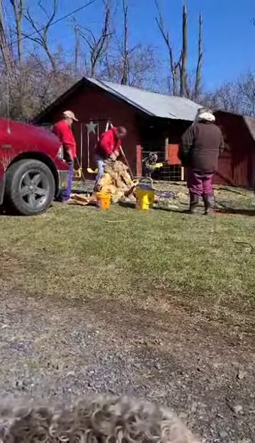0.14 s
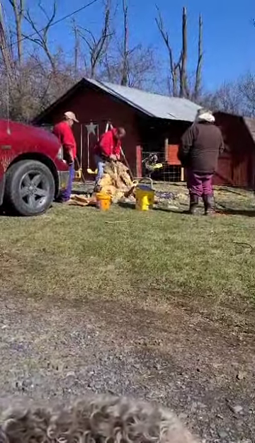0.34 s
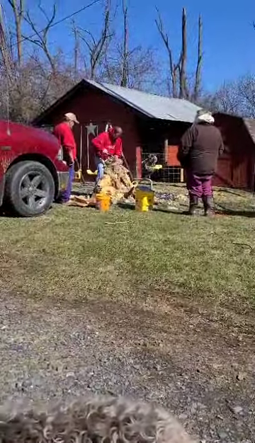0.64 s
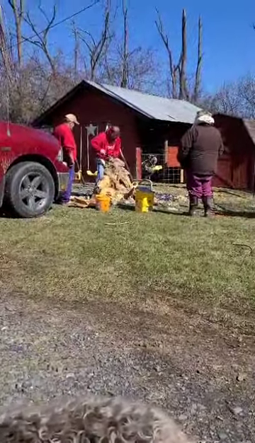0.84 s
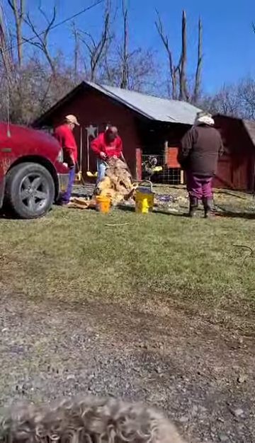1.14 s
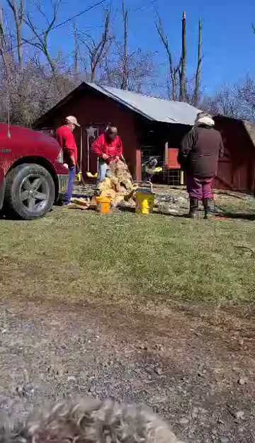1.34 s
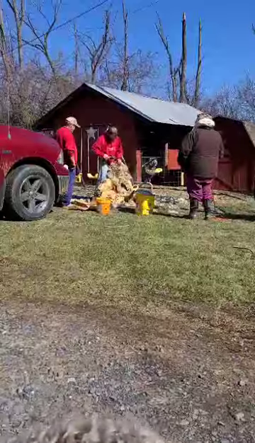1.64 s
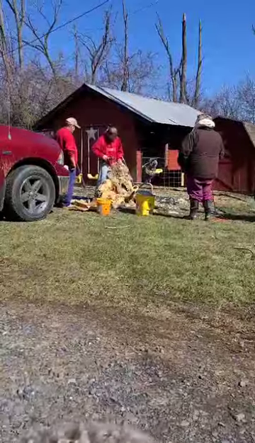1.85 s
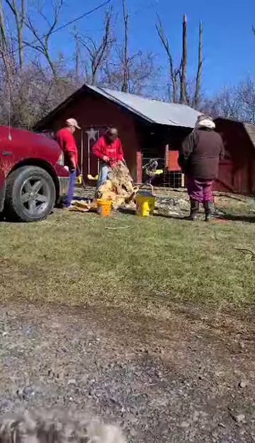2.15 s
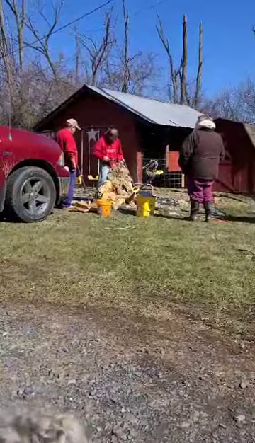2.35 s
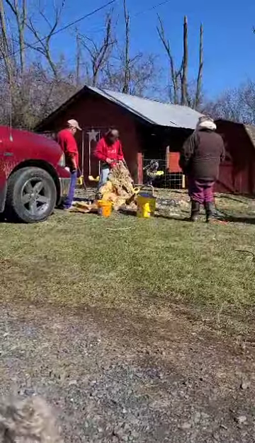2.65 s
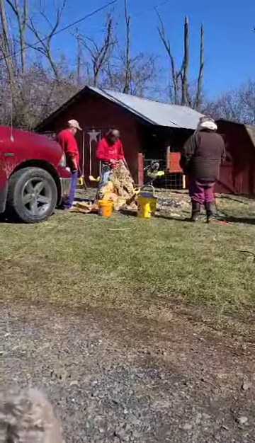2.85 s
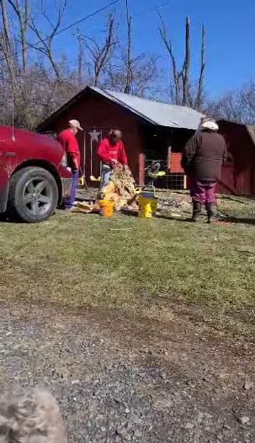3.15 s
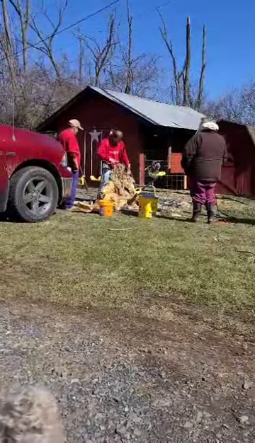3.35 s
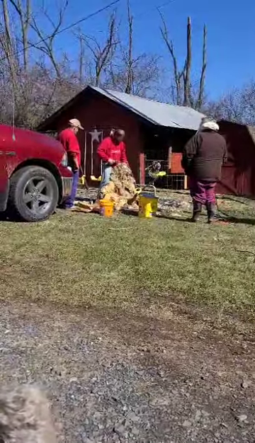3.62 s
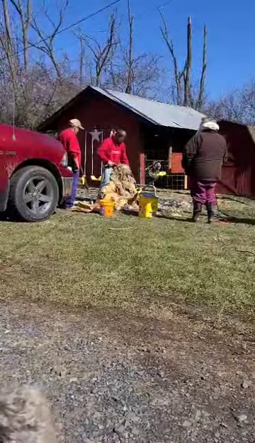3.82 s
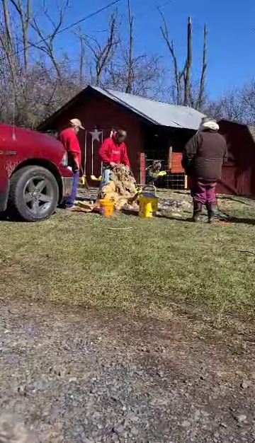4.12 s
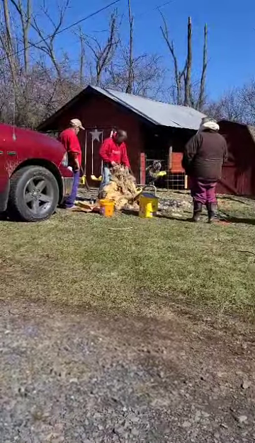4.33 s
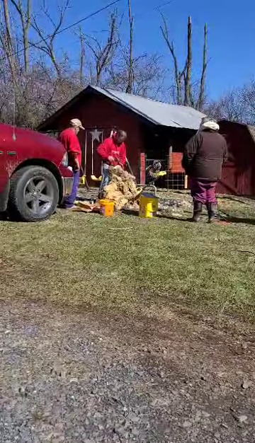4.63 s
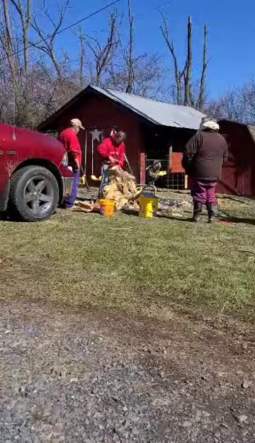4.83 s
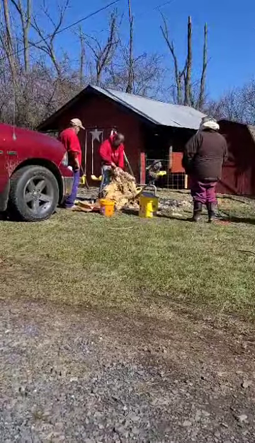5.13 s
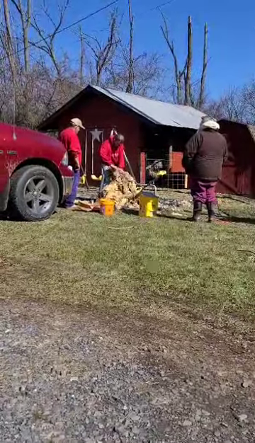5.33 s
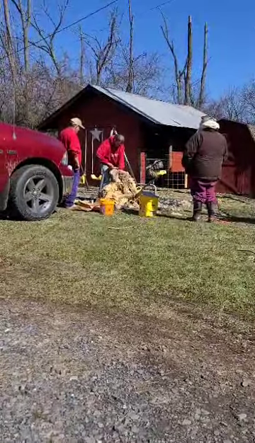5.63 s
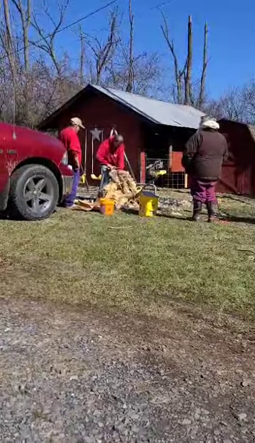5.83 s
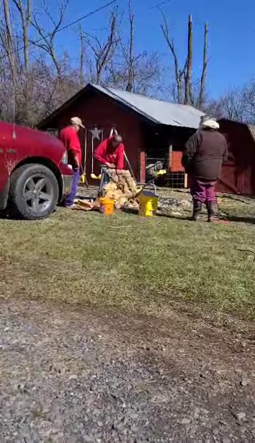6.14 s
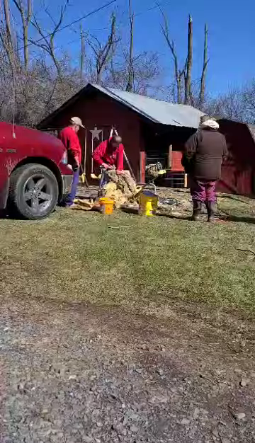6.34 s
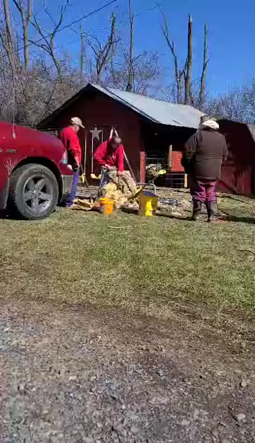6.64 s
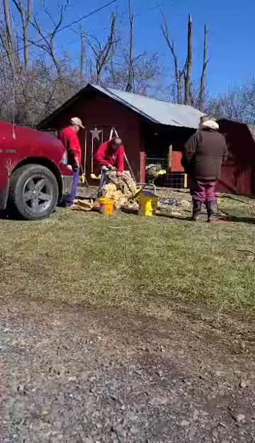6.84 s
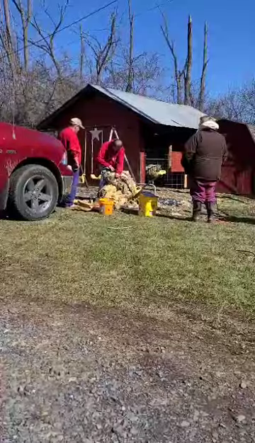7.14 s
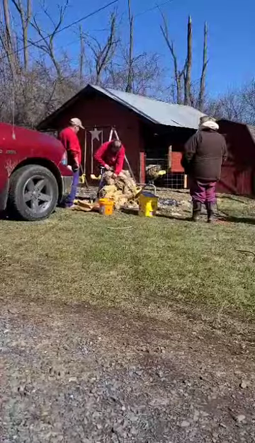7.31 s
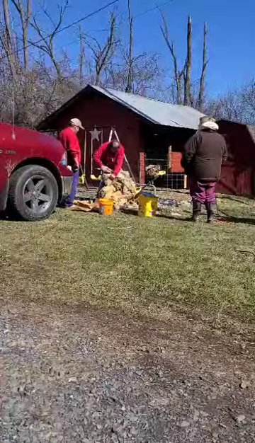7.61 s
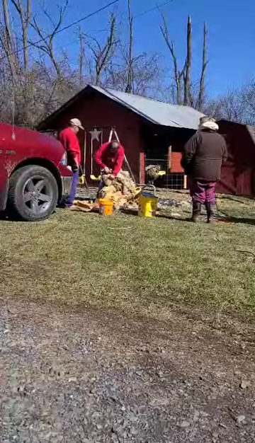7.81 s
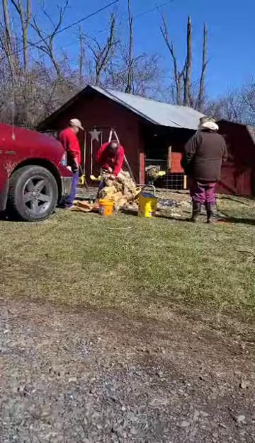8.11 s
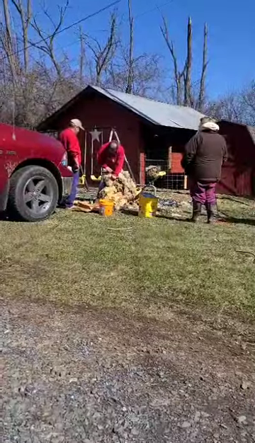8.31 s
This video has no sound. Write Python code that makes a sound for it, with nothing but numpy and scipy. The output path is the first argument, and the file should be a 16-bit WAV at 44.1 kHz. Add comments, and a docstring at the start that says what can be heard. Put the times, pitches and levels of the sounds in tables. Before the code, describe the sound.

An electric shearing handpiece buzzes and whines steadily outdoors, blades chattering and hissing through wool, its motor sagging and ringing louder past the middle.

```python
"""In a farmyard, some metres away in front of a barn, a sheep is shorn.
Gliding tones make the electric motor whine and sag; its cutter's two knocks per stroke cycle set off chatter
that rings the handpiece through resonant bands, and broad bands of it hiss as blades in the wool.
Wavering low tones idle as a far engine over outdoor rumble; noise bursts and low rings scuff close by.
Past the middle the shearer turns the handpiece: hiss and whine recede and the blades ring louder."""
import sys
import numpy as np
from scipy import signal
from scipy.fft import rfft, irfft
from scipy.io import wavfile

SR = 44100
rng = np.random.default_rng(int(sys.argv[2]) if len(sys.argv) > 2 else 0)


def waveform_to_disk(signal):
    """Save audio, clipped to [-1, 1], as 16-bit WAV at the path in sys.argv[1]."""
    frames = np.transpose(np.atleast_2d(signal))
    scaled = np.clip(frames, -1, 1) * 32767
    samples = np.round(scaled).astype(np.int16)
    wavfile.write(sys.argv[1], SR, samples)


N = 373527
TIME = np.arange(N) / SR

# Levels are mix settings; later gains and filters still shape them.
# Outdoor background spectrum: (frequency [Hz], relative density [dB])
AIR_SPECTRUM = [(20, -3), (40, -20), (60, -0.5), (105, -6), (150, -11), (220, -15), (350, -11), (550, -15),
                (950, -18.5), (3000, -5), (4200, -12.5), (5500, -22), (9000, -24), (15000, -92)]
# Far engine: (time [s], firing rate [Hz], firing tone level [dB], low drone level [dB])
FAR_ENGINE = [(0, 17, -51, -74), (1.5, 17.8, -56, -52), (2.6, 14.1, -56, -56), (3.3, 17, -60, -47.5),
              (3.8, 20.4, -57, -58), (5.4, 18.7, -54, -53.5), (6.3, 19.8, -50, -75), (7.3, 19.1, -51, -96),
              (8.47, 20, -51.5, -58)]
# Overtones of the engine: (multiple of firing rate [-], relative level [dB])
FIRING_TONES = [(2, -12), (3, -7), (4, 1), (5, 0.5), (6, -2), (7, -8.5)]
# A low, wandering hum: (time [s], centre pitch [Hz], relative level [dB])
WANDERING_HUM = [(0, 96.9, -54), (.8, 90, -50), (1.7, 87, -48.5), (2.2, 94.3, -51), (2.9, 88.3, -48),
                 (3.7, 83.06, -50), (5.4, 84, -52), (8.47, 90.5, -57)]

# Motor speed, sagging twice as the comb is driven into thick wool: (time [s], gear mesh pitch [Hz])
MESH_PITCH = [(0.0, 2359), (0.2, 2356), (0.45, 2378), (0.63, 2387), (1.2, 2391), (1.7, 2382), (2.0, 2387),
              (2.5, 2381), (2.74, 2386), (3.1, 2374), (3.9, 2368), (4.27, 2355), (4.58, 2389), (4.84, 2397),
              (5.38, 2375), (5.78, 2215), (5.99, 2212), (6.3, 2380), (6.68, 2416), (6.97, 2387),
              (7.15, 2335), (7.48, 2436), (7.77, 2454), (7.91, 2375), (8.0, 2270), (8.12, 2145),
              (8.28, 2065), (8.47, 2190)]
MESH_PER_TURN = 62.6
TURN_START_S, TURN_END_S = 4.9, 6.73  # the shearer turns other parts of the handpiece to the listener

# Resonances of each part, all as (centre [Hz], width [Hz], relative level [dB])
MOTOR_MODES = [(425, 210, -7.5), (685, 75, -1.5), (818, 104, -4.5)]
HOUSING_MODES = [(1217, 182, 0.52), (1403, 104, 0), (1600, 216, -2.3)]
TUBE_MODES = [(1780, 240, -2.2), (1983, 200, -1.3), (2152, 85, 0.82)]
FORK_MODES = [(2552, 97, 4.5), (2814, 144, 4.5), (3105, 240, -2.5)]
COMB_MODES = [(3252, 290, 3), (3573, 205, 3), (3753, 230, -3.5), (4090, 136, -4.5), (4380, 100, -13)]
TOOTH_MODES = [(4764, 640, 2.5), (4980, 300, 9.5), (5333, 230, 6.5), (5724, 420, 5.5), (6580, 1060, -1)]
TIP_MODES = [(6760, 430, -6.5), (7090, 230, 1.5), (7450, 230, -1), (8030, 800, -5)]
SIZZLE_MODES = [(9350, 110, 5), (12230, 2720, 7), (15200, 1400, -5.5)]
PART_UNEVEN_DB = 2.64  # spread of one knock's strength from part to part, before clipping

# Motor drone: (time [s], level [dB])
DRONE_LEVEL = [(0, -51), (.9, -64), (1.4, -56.5), (2.6, -53), (3.15, -59), (4.2, -53), (4.8, -53),
               (5.1, -63), (5.8, -60), (6.0, -48), (6.6, -58), (7.95, -51.5), (8.47, -52)]
# Force of the handpiece rattle, used as a swing about its mean: (time [s], level [dB])
RATTLE_FORCE = [(0.0, -39.5), (0.09, -41.5), (0.57, -37.5), (0.8, -44.5), (2.38, -44.5), (3.3, -43.5),
                (3.55, -40.5), (3.89, -40.5), (4.48, -46), (4.64, -40), (5.4, -51), (5.73, -44.5),
                (6.77, -40.5), (6.96, -48), (7.05, -39.5), (7.24, -49), (7.76, -40.5), (8.47, -44)]
# Ring of the comb between bites: (time [s], relative level [dB])
COMB_LEVEL = [(0, -44), (.25, -43.5), (1.1, -43.5), (1.9, -45), (3.0, -40), (4.0, -38), (4.3, -42),
              (4.7, -41), (5.3, -43), (6.0, -39), (6.6, -35.5), (7.1, -40), (7.5, -46.5), (8.47, -45)]
# The comb bites into a lock and the ring changes:
# (time [s], half length [s], fork gain [dB], comb gain [dB])
COMB_BITES = [(1.3, 0.14, 9.5, -2), (2.66, 0.018, 1, 2.5), (2.84, 0.24, 10.5, 2), (3.38, 0.058, 10, 8),
              (3.64, 0.066, 5, 3), (4.54, 0.11, 5, 4), (4.72, 0.064, 9, 4.5), (4.85, 0.052, 17, 3.5),
              (4.97, 0.032, 1, 11), (6.01, 0.035, 5, 9), (6.26, 0.044, -1, 5.5), (6.44, 0.016, -1, 5.5),
              (7.16, 0.063, 7.5, -1.5), (7.35, 0.03, 3.5, 5.5), (7.88, 0.058, 4.5, 4),
              (8.39, 0.051, 7.5, 6)]
# Amount of wool being cut, used relative to its middle value: (time [s], hiss control [dB])
WOOL_CUT = [(0, -42), (.07, -42.5), (.25, -46), (.6, -44.5), (.92, -45), (1.12, -44), (1.35, -43),
            (1.65, -44), (2.2, -41), (2.6, -42), (3.2, -45), (3.55, -41.5), (4.3, -45), (4.6, -42.5),
            (5.05, -45), (5.72, -44), (5.85, -46), (8.47, -49.5)]
# Fine sizzle above the teeth: (time [s], level [dB])
SIZZLE_LEVEL = [(0, -44), (.35, -48), (.65, -46.5), (1.6, -51.5), (2.6, -46), (3.1, -54), (3.55, -50),
                (4.25, -52), (4.6, -48.5), (5.8, -53), (8.47, -52.5)]

# Octave of the gear whine between swells: (time [s], level [dB])
OCTAVE_LEVEL = [(0, -39.5), (.18, -42), (.28, -53), (.4, -46), (.6, -40), (1.2, -44.5), (1.38, -47.5),
                (1.78, -47.5), (1.9, -41.5), (2.1, -38), (2.25, -41), (2.6, -46), (2.7, -38), (3.4, -38),
                (3.7, -37), (3.85, -46), (4.1, -43), (4.3, -46), (4.7, -40.5), (4.97, -42.5), (5.04, -46),
                (5.4, -56), (5.8, -73), (6.3, -51), (6.6, -44), (7.1, -46), (7.3, -62), (7.7, -50),
                (8.05, -46.5), (8.47, -41)]
# The whine changes as the handpiece is angled:
# (time [s], half length [s], mesh tone gain [dB], octave gain [dB], left over right [dB])
WHINE_GESTURES = [(.04, 0.26, 6, 5.5, 5), (.5, 0.074, 7, -2, 11), (1.29, 0.064, 7, 13, -6),
                  (1.53, 0.09, -1, 17.5, -1), (1.65, 0.048, 0, 10, 1), (1.96, 0.074, 2, 7, -13),
                  (2.085, 0.034, 3, 9.5, -6), (2.2, 0.04, 6, 10, -3), (2.315, .03, 4, 11, 0),
                  (2.42, 0.046, 4, 13.5, -2), (2.52, 0.032, 1, 11, -1), (2.82, 0.1, 14, 3.5, 1),
                  (3.1, 0.15, -6, 1, -2), (3.55, 0.1, 3, 1.5, 6), (4.43, 0.037, -12, 7, 9),
                  (4.58, 0.064, -9, 9, 1), (4.88, 0.053, 7, 7.5, -5), (4.94, 0.08, 5.5, 0.5, 5),
                  (5.2, 0.1, 12.5, 5, 15), (5.83, 0.12, 11, 6, 0), (6.35, 0.093, 2, 0, 15),
                  (6.86, 0.3, 10.5, 0.5, 1), (7.13, 0.065, 0, 8, 0), (7.66, 0.22, 13, 4, -12),
                  (7.9, .07, 6, -1, -10)]
MESH_TONE_DB = -53  # between swells
WHINE_THROB, THROB_PER_DB = .43, 1  # throb scale; its deepening per dB of cutting, within limits
WHINE_FLUTTER_DB = 1.0  # random flutter, rms
KNOCK_JOLT_HZ = 19  # rms pitch swing of the octave as knocks jolt the gears

# Overtones of the crank shaft: (multiple of shaft speed [-], relative level [dB])
CRANK_TONES = [(27, -76), (28, -70), (29, -64), (31, -64.5), (32, -72), (35, -61), (36, -62.5), (37, -58),
               (38, -82.5), (40, -58), (42, -68), (45, -64.5), (47, -58), (61, -62.5), (65, -55),
               (132, -76), (141, -62)]
# Low motor hum: (time [s], level [dB])
MOTOR_HUM_LEVEL = [(0, -59), (1.5, -57.5), (2.8, -55), (3.05, -67), (3.45, -62), (3.7, -55), (4.2, -54),
                   (5.2, -62), (6.2, -59), (7.6, -56), (8.0, -51), (8.47, -54.5)]
# Response of the motor case, through which its overtones slide: (frequency [Hz], gain [dB])
CASE_RESPONSE = [(300, -13), (380, -8), (460, -6), (540, -14), (575, -14), (610, 0), (690, 0), (770, -2.5),
                 (840, -8), (930, -15)]
ODD_ORDER_DB = -6
# Side tones of the labouring gears: (multiple of shaft speed [-], relative level [dB])
GEAR_SIDE_TONES = [(118, -58), (121, -70), (129, -66), (133, -73)]
LABOUR_FULL = 0.1  # fractional change of speed at which the side tones are fully heard

# Faint brief tones: (time [s], half length [s], centre pitch [Hz], level [dB])
BRIEF_TONES = [(0.038, 0.076, 209, -58), (3.29, .015, 800, -56), (3.343, 0.022, 885, -53),
               (7.515, .04, 880, -52), (7.52, .035, 1296, -52), (7.658, 0.055, 1220, -53),
               (7.81, .045, 1260, -51), (8.15, .03, 1210, -52)]
# Soft scuffs: (time [s], relative level [dB], rise [s], decay [s])
SCUFF_EVENTS = [(.05, -57, 0.087, 0.072), (1.49, -55, 0.018, 0.029), (2.641, -37.5, 0.0071, 0.01),
                (2.675, -44, .005, 0.011), (2.747, -39.5, 0.018, 0.026), (2.798, -46, 0.0053, 0.011),
                (2.92, -50.5, 0.06, 0.097), (3.49, -46.5, 0.02, 0.04), (3.566, -39, 0.034, 0.025),
                (3.63, -45.5, 0.013, 0.046), (4.19, -45.5, 0.0082, 0.02), (4.272, -44.5, 0.011, .02),
                (6.005, -47, 0.02, 0.02), (6.13, -51, 0.039, 0.059)]
# Resonances that sing out while the comb is held at an angle:
# (start [s], end [s], centre [Hz], width [Hz], level [dB], left over right [dB])
SINGING_MODES = [(0.23, 1.4, 1722, 45, -45, -12), (0.5, 1.49, 3280, 140, -40.5, -15),
                 (0.08, 3.6, 2840, 110, -45, -7), (1.25, 2.9, 1372, 46, -54, 0),
                 (4.4, 4.6, 2860, 82, -44, 10), (6.35, 7.0, 3600, 74, -41.5, -4),
                 (5.8, 8.0, 4110, 130, -45, -3.5), (5.7, 7.9, 2070, 125, -46, -3),
                 (3.7, 4.6, 6400, 300, -49, -12), (6.2, 8.47, 1235, 59, -54, 20),
                 (2.72, 2.95, 3600, 160, -38.5, -4), (2.72, 2.92, 2830, 110, -43, -1)]
# Dull knocks that start some of the scuffs: (time [s], relative level [dB], pitch [Hz])
THUMP_EVENTS = [(2.639, -27, 323), (2.744, -33, 328), (2.796, -36, 340), (3.562, -28, 320),
                (4.268, -39, 290), (6.0, -37, 310)]
# Sharp snaps of the cutter: (time [s], relative level [dB], centre [Hz])
SNAP_EVENTS = [(2.642, -26, 1930), (2.642, -20.5, 3300), (2.669, -21, 3230), (2.877, -18.5, 3330),
               (3.035, -21, 2830), (3.353, -22, 3430), (3.879, -21, 3600), (3.987, -26, 2010),
               (4.566, -22, 3500), (5.703, -23, 3700), (5.957, -20, 3610), (6.013, -17, 3670),
               (6.043, -21, 3640), (6.206, -24, 3100), (6.860, -25, 3540), (7.149, -20, 2860),
               (7.203, -26, 2730), (7.335, -21, 3550), (7.454, -22, 2900), (8.123, -22, 2770),
               (8.214, -21, 2900), (8.350, -28, 2800)]
# The comb's strongest ring slides as the handpiece is turned and pushed along:
# (time [s], centre [Hz], level [dB], left over right [dB])
RING_SLIDE = [(5.4, 3540, -60, -7), (5.55, 3600, -34, -7), (5.78, 3600, -30.5, -8), (6.03, 3670, -35, -5),
              (6.12, 3450, -41, 3), (6.22, 3270, -39, 4), (6.3, 3570, -35, -5), (6.75, 3680, -38.5, -2),
              (6.92, 3320, -46, 0), (7.07, 3160, -38, 2), (7.15, 2850, -33, -12), (7.22, 2740, -32, -17),
              (7.3, 2730, -50, -16), (7.44, 2510, -43, -16), (7.52, 2522, -41.5, -14),
              (7.79, 2510, -38.5, -12), (7.94, 2370, -43, -6), (7.99, 2500, -42, -14),
              (8.07, 2690, -37, -20), (8.25, 2700, -42, -25), (8.47, 2810, -38, -21)]
SLIDING_WIDTH_HZ = 160

CUTOFF_HZ = 15500


def from_db(db):
    """Decibels to an amplitude factor."""
    return 10 ** (np.asarray(db) / 20)


def rms_one(x):
    """Scales a sound to rms 1."""
    return x / np.sqrt(np.mean(x ** 2) + 1e-20)


def in_time(rows):
    """Columns of a curve table, one value per sample."""
    s, *columns = np.transpose(rows)
    return [np.interp(TIME, s, c) for c in columns]


def drift(rate_hz):
    """Smooth chance of rms 1: noise through two equal poles, at one value per 40 samples."""
    pole = np.exp(-80 * np.pi * rate_hz / SR)
    noise = rng.standard_normal(N // 40 + 2002)
    slow = signal.lfilter([1], [1, -2 * pole, pole * pole], noise)[2000:]  # drop the settling
    return np.interp(np.arange(N) / 40, np.arange(len(slow)), rms_one(slow))


def tone(hz):
    """A sine of rms 1 that follows a pitch curve."""
    return np.sqrt(2) * np.sin(2 * np.pi * (np.cumsum(hz) / SR + rng.random()))


def band(x, hz, width_hz):
    """One resonance with steep skirts."""
    edges = np.clip([hz - width_hz / 2, hz + width_hz / 2], 15, .45 * SR)
    return signal.sosfilt(signal.butter(2, edges, "band", fs=SR, output="sos"), x + 1e-18)


def stereo_noise(spread):
    """White noise, partly different in the two ears."""
    mid, side = rng.standard_normal((2, N))
    return rms_one(mid + spread * side * np.array([[1], [-1]]))


def pan(left_db):
    """Gains of the two channels, mean power 1."""
    gains = from_db(np.array([[.5], [-.5]]) * left_db)
    return gains / np.sqrt(np.mean(gains ** 2, axis=0))


def off_centre(x, count):
    """The sound reaches the second channel a few samples late."""
    return np.array([x[0], np.pad(x[1], (count, 0))[:N]])


def swell_shape(s, half_s):
    """A smooth rise and fall of height 1 around s."""
    return np.exp(-np.minimum(((TIME - s) / half_s) ** 2, 30))


def gestures(rows):
    """Sums the swells of an event table: one curve in dB per column after time and half length."""
    return sum(np.outer(amounts, swell_shape(s, half_s)) for s, half_s, *amounts in rows)


def burst(s, rise_s, decay_s):
    """An envelope of height 1 that peaks at s."""
    age = np.where(TIME < s, (s - TIME) / rise_s, (TIME - s) / decay_s)
    return np.exp(-np.minimum(age, 30))


def turned(before_db, after_db):
    """A level or direction that glides to a new value while the handpiece is turned."""
    return np.interp(TIME, [TURN_START_S, TURN_END_S], [before_db, after_db])


def follows(control_db, share):
    """A share of a control's swing about its mean."""
    return share * (control_db - control_db.mean())


def thinned(x, edge_hz):
    """Small soft contacts carry no deep bass."""
    return signal.sosfilt(signal.butter(2, edge_hz, "high", fs=SR, output="sos"), x + 1e-18)


def air():
    """Steady outdoor rumble, nearly alike in both ears in the bass."""
    hz = np.maximum(np.arange(N // 2 + 1) * SR / N, 1)
    points_hz, points_db = np.transpose(AIR_SPECTRUM)
    gain = from_db(np.interp(np.log(hz), np.log(points_hz), points_db))
    mid, side = rfft(rng.standard_normal((2, N)))
    spread = np.minimum(0.15 + hz / 1400, .7)
    spectrum = gain * (mid + spread * side * np.array([[1], [-1]]))
    return from_db(-44) * rms_one(irfft(spectrum, N))


def far_engine():
    """Only the low tones of an idling engine carry this far; they waver on the way."""
    firing_hz, engine_db, drone_db = in_time(FAR_ENGINE)
    hum_hz, hum_db = in_time(WANDERING_HUM)
    firing = rms_one(sum(from_db(db + 3.0 * drift(4.2)) * tone(order * firing_hz)
                         for order, db in FIRING_TONES))
    drone = tone(57 + 0.7 * drift(1.4))
    hum_hz = hum_hz + 2.45 * drift(2.95)
    hum = tone(hum_hz) + from_db(-5.0) * tone(1.22 * hum_hz)
    return from_db(engine_db) * firing + from_db(drone_db) * drone + from_db(hum_db - 4.0) * hum


def knocks(shaft_hz, return_db, return_late_s, uneven_db, jitter_s):
    """The cutter knocks twice per turn; the return stroke is weaker and late, and knocks vary."""
    at = np.flatnonzero(np.diff(np.floor(2 * np.cumsum(shaft_hz) / SR)))
    size, late = rng.standard_normal((len(at), 2)).T
    returning = np.arange(len(at)) % 2
    delay_s = late * jitter_s + returning * return_late_s
    landing = np.clip(at + np.round(delay_s * SR).astype(int), 0, N - 1)
    clicks = np.zeros(N)
    clicks[landing] = from_db(return_db * returning + uneven_db * np.clip(size, -2, 2))
    return clicks


def chatter_force(clicks, decay_s, rub, clean, spread):
    """Each knock hits a part with its own strength and starts a short chatter over steady rubbing."""
    blows = clicks * from_db(PART_UNEVEN_DB * np.clip(drift(60), -1.6, 1.6))
    chatter = rms_one(signal.lfilter([1], [1, -np.exp(-1 / (decay_s * SR))], blows))
    rough = np.sqrt(chatter ** 2 + rub ** 2) * stereo_noise(spread)
    return rough + clean * rms_one(blows)


def rattle(clicks, modes, decay_s, rub, clean, spread, flicker_db):
    """Chatter rings the modes of one part, with alternating signs, each wavering in strength."""
    force = chatter_force(clicks, decay_s, rub, clean, spread)
    return rms_one(sum((-1) ** k * from_db(db + flicker_db * drift(7.2)) * band(force, hz, width)
                       for k, (hz, width, db) in enumerate(modes)))


def casing(clicks):
    """The motor drones; housing and tube follow the rattle, and the tube takes over in the turn."""
    rattle_db, = in_time(RATTLE_FORCE)
    motor_db, = in_time(DRONE_LEVEL)
    housing_db = turned(before_db=-46.0, after_db=-52) + follows(rattle_db, share=1.24)
    tube_db = turned(before_db=-47.5, after_db=-45.5) + follows(rattle_db, share=0.98)
    motor = rattle(clicks, MOTOR_MODES, decay_s=0.0038, rub=0.88, clean=0.66, spread=1.0, flicker_db=2.5)
    housing = pan(turned(before_db=3.5, after_db=10.0)) * rattle(
        clicks, HOUSING_MODES, decay_s=0.0039, rub=1.0, clean=0.88, spread=0.49, flicker_db=2.5)
    tube = pan(-5.0) * rattle(
        clicks, TUBE_MODES, decay_s=0.0047, rub=0.98, clean=0.72, spread=0.085, flicker_db=1.5)
    return from_db(motor_db) * motor + from_db(housing_db) * housing + from_db(tube_db) * tube


def blades(clicks):
    """Fork and comb ring from the chatter, and their ring changes with every bite."""
    fork_bite_db, comb_bite_db = gestures(COMB_BITES)
    fork_db = turned(before_db=-49.0, after_db=-39.0) + fork_bite_db
    comb_db = in_time(COMB_LEVEL)[0] + comb_bite_db + 2.0
    fork = pan(turned(before_db=3.0, after_db=-18)) * rattle(
        clicks, FORK_MODES, decay_s=0.0022, rub=1.0, clean=0.9, spread=0.95, flicker_db=2.0)
    comb = pan(turned(before_db=-7.5, after_db=-0.3)) * rattle(
        clicks, COMB_MODES, decay_s=0.0052, rub=1.0, clean=0.71, spread=0.17, flicker_db=2.0)
    return from_db(fork_db) * fork + from_db(comb_db) * comb


def wool_hiss(clicks):
    """Teeth and tooth tips follow the amount of wool being cut, under a fine sizzle."""
    cut_db, = in_time(WOOL_CUT)
    teeth_db = -39.5 + follows(cut_db, share=1.24)
    tips_db = -46.0 + follows(cut_db, share=0.68)
    sizzle_db, = in_time(SIZZLE_LEVEL)
    teeth = pan(turned(before_db=-6.5, after_db=-5.0)) * rattle(
        clicks, TOOTH_MODES, decay_s=0.0074, rub=1.43, clean=0.59, spread=0.71, flicker_db=2.5)
    tips = pan(6.1) * rattle(
        clicks, TIP_MODES, decay_s=0.0018, rub=1.7, clean=0.15, spread=1.0, flicker_db=1.4)
    sizzle = pan(-0.88) * rattle(
        clicks, SIZZLE_MODES, decay_s=0.0045, rub=1.6, clean=0.12, spread=1.0, flicker_db=2.0)
    return from_db(teeth_db) * teeth + from_db(tips_db) * tips + from_db(sizzle_db) * sizzle


def handpiece(clicks):
    """The ringing parts and the hiss of the blades."""
    return casing(clicks) + blades(clicks) + wool_hiss(clicks)


def gear_whine(mesh_hz, off_speed, clicks, throb, rough, off_speed_rough, off_speed_db):
    """The mesh tone and its octave throb with the knocks, and turn rough and weak off usual speed."""
    mesh_swell_db, octave_swell_db, left_db = gestures(WHINE_GESTURES)
    smooth_knocks = signal.sosfilt(signal.butter(4, 95, fs=SR, output="sos"), clicks)
    push = rms_one(smooth_knocks - smooth_knocks.mean())
    cut_db, = in_time(WOOL_CUT)
    depth = throb * np.clip(-2 + THROB_PER_DB * (cut_db - np.median(cut_db)), .5, 1.3)
    swell = (1 + depth * push) * from_db(WHINE_FLUTTER_DB * drift(4.8))
    jolt = np.interp(TIME - .0018, TIME, push)  # the pitch answers 1.8 ms late
    blur = rough + off_speed_rough * off_speed

    def smeared(hz):
        """Three randomly wavering copies blur the line."""
        return rms_one(drift(33) * tone(hz) + drift(58) * tone(hz) + drift(41) * tone(hz))

    def partial(hz):
        """One throbbing tone with a blurred stereo halo."""
        smear = np.array([smeared(hz) for _ in range(3)])
        halo = smear[0] + .5 * smear[1:]  # one shared, one for each ear
        return rms_one(swell * (tone(hz) + blur * halo) / np.sqrt(1 + blur ** 2))

    octave_db = in_time(OCTAVE_LEVEL)[0] + octave_swell_db
    octave = from_db(octave_db) * pan(left_db) * partial(2 * mesh_hz + KNOCK_JOLT_HZ * jolt)
    mesh = from_db(MESH_TONE_DB + mesh_swell_db) * pan(-17.0) * partial(mesh_hz)
    return from_db(off_speed_db * off_speed) * (octave + mesh)


def shaft_tones(shaft_hz, waver_db):
    """Faint clean overtones of the turning crank waver, and fade as the handpiece turns away."""
    tones = sum(from_db(db + waver_db * drift(1.6)) * tone(order * shaft_hz) for order, db in CRANK_TONES)
    return from_db(turned(before_db=-1.4, after_db=-3.5)) * tones


def motor_hum(shaft_hz, waver_db):
    """Low overtones slide through the case resonances; two strokes a turn favour the even ones."""
    case_hz, case_db = np.transpose(CASE_RESPONSE)

    def overtone(k):
        """One shaft multiple, coloured by the case."""
        db = np.interp(k * shaft_hz, case_hz, case_db) + ODD_ORDER_DB * (k % 2)
        return from_db(db + waver_db * drift(3.9)) * tone(k * shaft_hz)

    return from_db(in_time(MOTOR_HUM_LEVEL)[0]) * rms_one(sum(overtone(k) for k in range(8, 25)))


def labour_tones(shaft_hz, off_speed, flutter_db):
    """Broken side tones glide along with the whine, stronger the further the motor is off speed."""
    tones = sum(from_db(db + flutter_db * drift(25)) * tone(order * shaft_hz)
                for order, db in GEAR_SIDE_TONES)
    return np.minimum(off_speed / LABOUR_FULL, 1) * pan(-18) * tones


def brief_tones(waver_hz):
    """Slightly unsteady sines rise and fall briefly."""
    return sum(from_db(db) * swell_shape(s, half_s) * tone(hz + waver_hz * drift(15.7))
               for s, half_s, hz, db in BRIEF_TONES)


def scuffs():
    """Soft close contacts push dull band noise with a little grit on top."""
    push = sum(from_db(db) * burst(s, rise, decay) for s, db, rise, decay in SCUFF_EVENTS)
    thud = rms_one(band(stereo_noise(0.12), 294, 197))
    grit = rms_one(signal.lfilter([1], [1, -.93], stereo_noise(0.47)))
    return push * pan(-4.0) * (thud + from_db(0.5) * grit)


def singing(clicks, fade_s, decay_s, rub, clean, spread):
    """A lightly damped mode swells and fades as the wool frees or loads it."""
    force = chatter_force(clicks, decay_s, rub, clean, spread)
    out = np.zeros((2, N))
    for start, end, hz, width, db, left_db in SINGING_MODES:
        held = np.clip(np.minimum(TIME - start, end - TIME) / fade_s, 0, 1)
        on = held > 0
        ring = rms_one(band(force[:, on], hz, width))
        out[:, on] += held[on] * from_db(db) * pan(left_db) * ring
    return out


def thumps(decay_s):
    """Each soft knock rings one low, heavily damped mode."""
    out, age = np.zeros(N), np.arange(SR // 8) / SR
    for s, db, hz in THUMP_EVENTS:
        at = round(s * SR)
        out[at:at + len(age)] += from_db(db) * np.sin(2 * np.pi * hz * age) * np.exp(-age / decay_s)
    return pan(-4) * out


def snaps(decay_s, grit):
    """Now and then the cutter snaps harder: one mode rings briefly under a gritty crack."""
    out, age = np.zeros((2, N)), np.arange(SR // 20) / SR
    for s, db, hz in SNAP_EVENTS:
        noise = rms_one(band(rng.standard_normal(len(age)), hz, 1600))
        crack = np.sin(2 * np.pi * hz * age) + grit * noise
        at = round(s * SR)
        out[:, at:at + len(age)] += pan(-8.5) * from_db(db) * crack * np.exp(-age / decay_s)
    return out


def sliding_ring(clicks, decay_s, rub, clean, spread):
    """The chatter rings one resonance whose centre moves with the grip."""
    hz, db, left_db = in_time(RING_SLIDE)
    turning = np.exp(2j * np.pi * np.cumsum(hz) / SR)
    force = chatter_force(clicks, decay_s, rub, clean, spread)
    lowpass = signal.butter(2, SLIDING_WIDTH_HZ / 2, fs=SR, output="sos")
    # shift the moving centre to 0 Hz, filter there, shift back
    ring = signal.sosfilt(lowpass, force / turning) * turning
    return from_db(db) * pan(left_db) * rms_one(ring.real)


def scene():
    """Motor speed drives knocks and tones; metal, drive and handling each get their own place."""
    mesh_hz, = in_time(MESH_PITCH)
    shaft_hz = mesh_hz / MESH_PER_TURN
    off_speed = np.abs(mesh_hz / np.median(mesh_hz) - 1)  # fraction away from usual speed, either way
    clicks = knocks(shaft_hz, return_db=-5.2, return_late_s=.0007, uneven_db=.9, jitter_s=.00002)

    metal = from_db(-1.02) * handpiece(clicks)
    metal += singing(clicks, fade_s=0.071, decay_s=0.0067, rub=0.43, clean=0.44, spread=0.14)
    metal += snaps(decay_s=0.0023, grit=0.22)
    metal += sliding_ring(clicks, decay_s=0.0053, rub=1.0, clean=0.78, spread=0.19)

    drive = gear_whine(mesh_hz, off_speed, clicks, throb=WHINE_THROB,
                       rough=0.25, off_speed_rough=2.0, off_speed_db=-18)
    drive += from_db(-55 * off_speed) * shaft_tones(shaft_hz, waver_db=1.0)
    drive += motor_hum(shaft_hz, waver_db=3.0)
    drive += labour_tones(shaft_hz, off_speed, flutter_db=6)

    handling = thinned(scuffs() + thumps(decay_s=0.0082), edge_hz=134)
    handling = off_centre(handling[::-1], count=24)[::-1]  # here the first channel is late

    shearing = off_centre(metal, count=3) + off_centre(drive, count=2)
    return shearing + handling + brief_tones(waver_hz=6.2) + far_engine() + air()


def record(dry):
    """The top is cut steeply."""
    return signal.sosfilt(signal.ellip(10, .2, 80, CUTOFF_HZ, fs=SR, output="sos"), dry)


dry = scene()
out = record(dry)
waveform_to_disk(out)
```